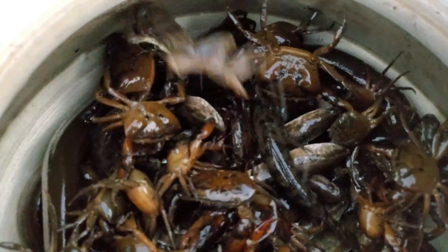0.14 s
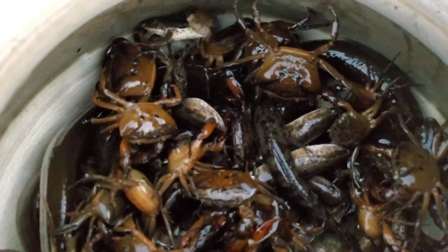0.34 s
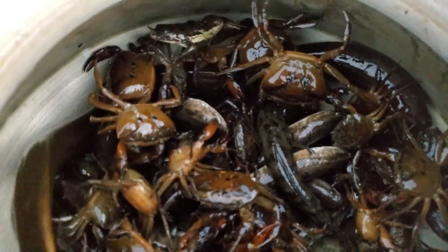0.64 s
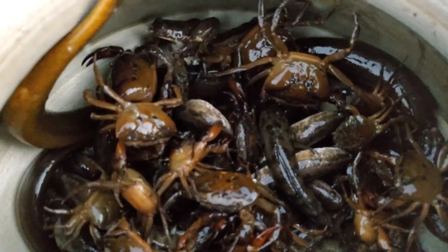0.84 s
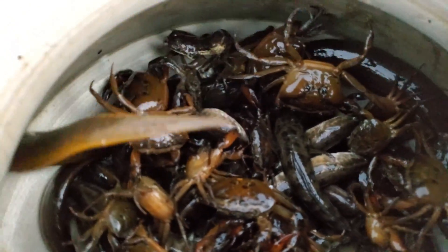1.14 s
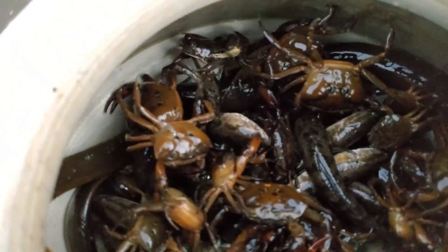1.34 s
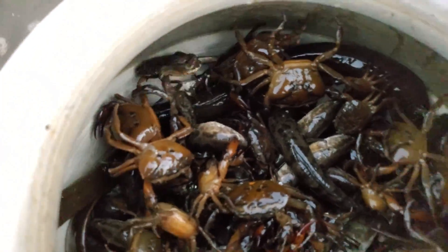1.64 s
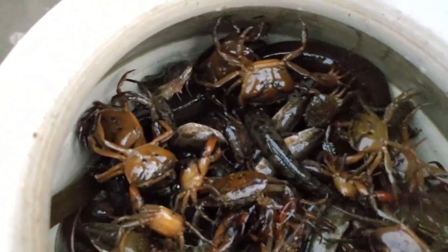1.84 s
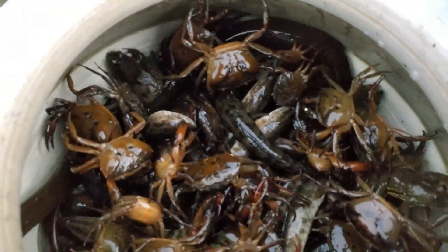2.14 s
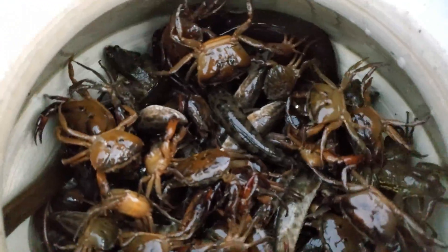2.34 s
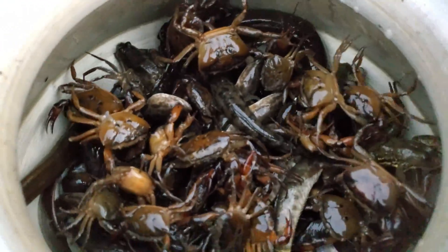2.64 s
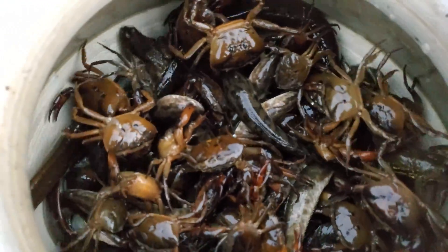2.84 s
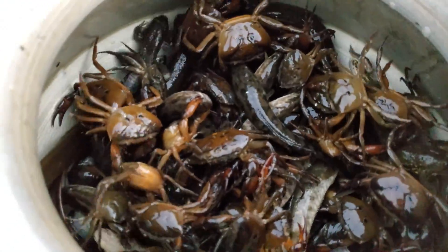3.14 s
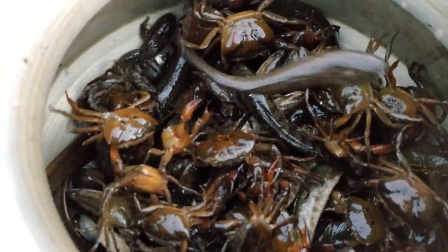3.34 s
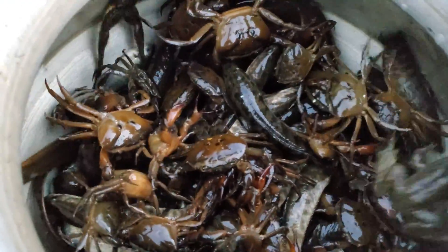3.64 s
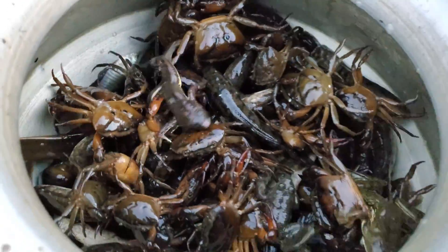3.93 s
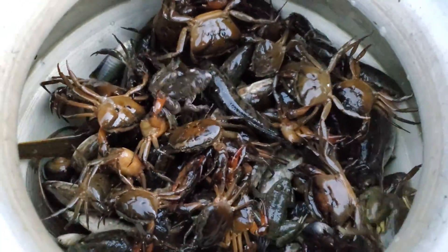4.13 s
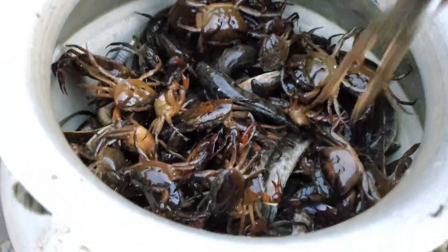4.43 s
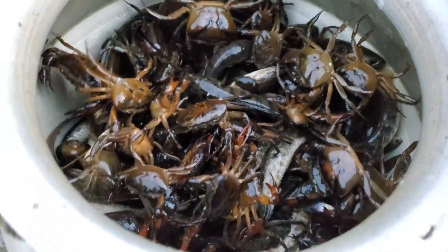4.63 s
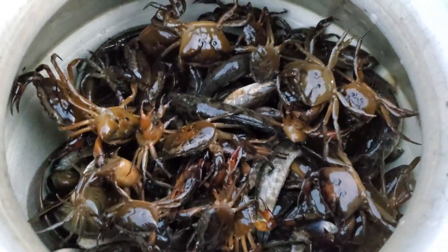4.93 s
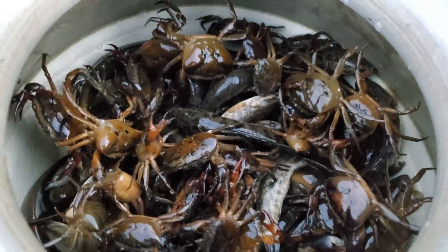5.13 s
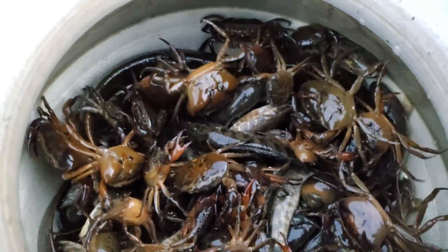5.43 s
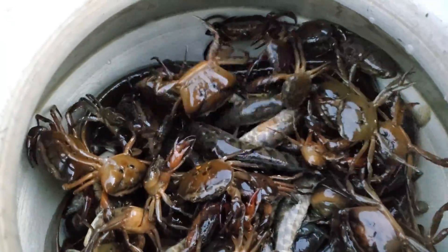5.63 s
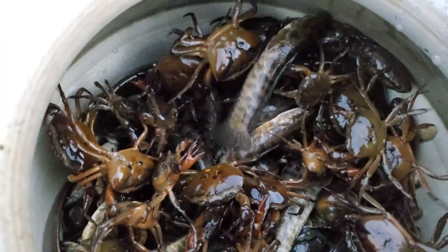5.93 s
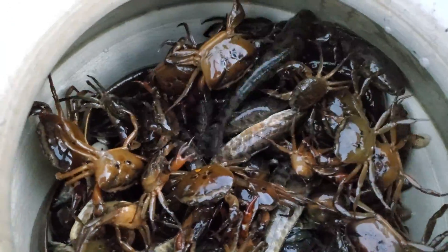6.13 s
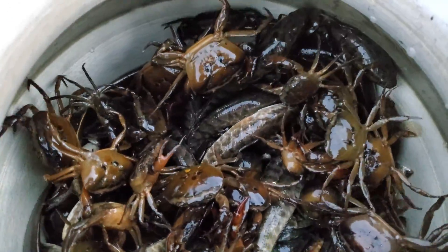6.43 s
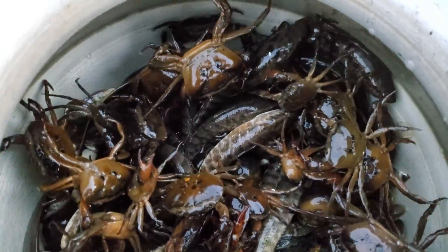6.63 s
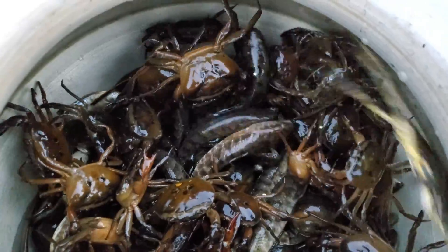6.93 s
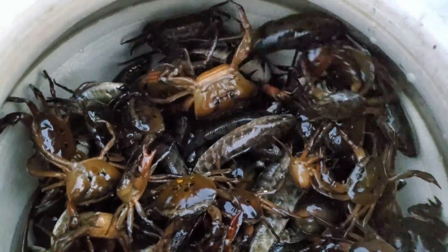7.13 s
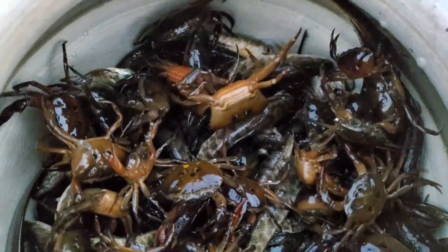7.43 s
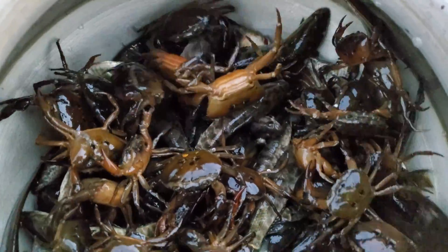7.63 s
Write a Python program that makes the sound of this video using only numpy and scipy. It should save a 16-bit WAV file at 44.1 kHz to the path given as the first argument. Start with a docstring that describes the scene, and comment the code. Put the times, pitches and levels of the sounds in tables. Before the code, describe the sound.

Close above a glazed pot, live crabs, frogs and small fish crawl over each other. Claws tick, skid and scrape in irregular wet bursts, making the wall ring briefly. Bubbles plop, shells squeak, and bodies land with soft low thuds, the strongest near the end of the sixth second. Faint bird chirps, distant traffic rumble and thin hiss lie behind. The crawling lasts throughout.

```python
"""Crabs, frogs and small fish crawl in a wet glazed pot, close below; traffic, birds and hiss lie behind.
From the start claws skid and tick: bursts of stick-slip grains and short modal rings excite the wall.
Bubbles pop from 0.4 s as decaying tones of rising pitch; soft blows ring the bottom from 1.9 s.
Bird trills, four arched chirps each, come at 2.2 and 4.1 s; air gulps as bending tones at 4.5 and 6.5 s.
The hardest taps fall at 4.5 and 4.7 s, the strongest thud at 5.9 s; the crawling lasts to the end."""
import sys
import numpy as np
from scipy import signal
from scipy.fft import rfft, irfft, next_fast_len
from scipy.io import wavfile

SR = 44100
rng = np.random.default_rng(int(sys.argv[2]) if len(sys.argv) > 2 else 0)


def master_out(mix):
    """Clip the mix to full scale and print it as 16-bit PCM to the path in sys.argv[1]."""
    frames = np.transpose(np.atleast_2d(mix))
    ceiling = np.clip(frames, -1, 1)
    pcm = np.round(ceiling * 32767).astype(np.int16)
    wavfile.write(sys.argv[1], SR, pcm)


N = 342657


def amp(db):
    """Level definition: decibels to amplitude ratio."""
    return 10 ** (np.asarray(db) / 20)


def rms_one(x):
    """Normalisation to unit effective value along the last axis."""
    return x / np.sqrt(np.mean(x ** 2, axis=-1, keepdims=True) + 1e-20)


def sides(pan_db):
    """Intensity stereo: left and right gains for a level difference, positive to the left."""
    return amp(np.array([pan_db / 2, -pan_db / 2]))


def drift(corner_hz):
    """Low-pass random process: noise through a double pole, scaled to unit spread."""
    step = 20   # samples between draws
    r = np.exp(-2 * np.pi * step * corner_hz / SR)
    draws = rng.standard_normal(N // step + 2002)
    slow = signal.lfilter([1], [1, -2 * r, r * r], draws)[2000:]   # without the settling
    return np.interp(np.arange(N) / step, np.arange(len(slow)), rms_one(slow))


def coloured(x, spectrum):
    """Spectral shaping: multiplies the Fourier transform by a gain curve over log frequency."""
    hz, level_db = np.transpose(spectrum)
    size = next_fast_len(N)
    bins_hz = np.arange(size // 2 + 1) * SR / size
    gain = amp(np.interp(np.log(bins_hz + 1), np.log(hz), level_db))
    return irfft(rfft(x, size) * gain, size)[..., :N]


def resonance(x, hz, width_hz):
    """Damped resonator: a pole pair sets frequency and bandwidth, with gain 1 at the top."""
    r = np.exp(-np.pi * width_hz / SR)
    zeros = [(1 - r * r) / 2, 0, (r * r - 1) / 2]
    poles = [1, -2 * r * np.cos(2 * np.pi * hz / SR), r * r]
    return signal.lfilter(zeros, poles, x)


def add(out, s, piece):
    """Superposition: mixes a piece in from time s."""
    i = round(s * SR)
    out[..., i:i + piece.shape[-1]] += piece[..., :N - i]


def highpass(x, order, corner_hz):
    """Butterworth high-pass: maximally flat above its corner."""
    return signal.sosfilt(signal.butter(order, corner_hz, "high", fs=SR, output="sos"), x)


def glides(table, waver_db):
    """Frequency modulation: tones bend along a parabola through three pitches, with a wavering level."""
    out = np.zeros(N)
    for s, length, start_hz, middle_hz, end_hz, level_db in table:
        u = np.linspace(0, 1, round(length * SR))
        hz = np.polyval(np.polyfit([0, .5, 1], [start_hz, middle_hz, end_hz], 2), u)
        tone = np.sin(2 * np.pi * np.cumsum(hz) / SR)
        soft_ends = signal.windows.tukey(len(u), .4)
        add(out, s, np.sqrt(2) * amp(level_db) * soft_ends * tone)
    return out * amp(waver_db * drift(56)) * sides(-1.0)[:, None]


def pops(rows):
    """Damped sliding oscillators; rows of t/s, level/dB, f/Hz at 10 ms, rise/(oct/s), t60/s, pan/dB."""
    out = np.zeros((2, N))
    for s, peak_db, hz, rise, t60, pan_db in rows:
        u = np.arange(round(t60 * SR) + 2) / SR
        turns = np.cumsum(hz * 2 ** (rise * (u - .01))) / SR
        shape = (1 - np.exp(-u / 0.00028)) * amp(peak_db - 60 * u / t60)
        add(out, s, sides(pan_db)[:, None] * shape * np.sin(2 * np.pi * turns))
    return out


def steady_db(t):
    """Piecewise-linear levels of rattle, knocking, scratch and fizz of the crawling heap at times t."""
    # the crawling heap: t/s, bustle level/dB, wet knocking level/dB
    heap = [(0.0, -34, -53), (0.69, -36.5, -49), (1.02, -30, -42.5), (1.21, -33, -40), (2.44, -32.5, -49.5),
            (2.75, -31, -57), (2.94, -32, -60), (3.18, -35.5, -40), (4.22, -35.5, -59), (4.78, -35, -47.5),
            (5.04, -42.5, -53), (5.26, -41.5, -54), (5.43, -41, -52), (5.84, -36, -43.5),
            (5.99, -33.5, -47.5), (6.32, -41.5, -58.5), (6.79, -37.5, -55.5), (7.16, -35.5, -43.5),
            (7.4, -30, -45.5), (7.77, -38, -41.5)]
    s, bustle_db, wet_db = np.transpose(heap)
    bustle_db, wet_db = np.interp(t, s, bustle_db), np.interp(t, s, wet_db)
    # fizz takes a share from the bustle, the rest from the wet knocking
    from_bustle = 0.58
    fizz_db = -3 + from_bustle * bustle_db + (1 - from_bustle) * wet_db
    return np.array([bustle_db - 1.5, wet_db, bustle_db - 0.5, fizz_db])


def at_random(per_s, column, above_db, low_hz, octaves, rises, t60s):
    """Poisson process: rows for pops at chance moments, whose level follows one steady layer."""
    chance = rng.random((1200, 6))
    starts = np.cumsum(-np.log(1 - chance[:, 0])) / per_s
    levels_db = steady_db(starts)[column] + above_db
    rows = []
    for s, level_db, (a, b, c, d, e) in zip(starts, levels_db, chance[:, 1:]):
        if s < N / SR:
            hz = low_hz * 2 ** (octaves * b)
            rise, t60 = np.interp(c, [0, 1], rises), np.interp(d, [0, 1], t60s)
            rows.append((s, level_db - 3.7 * a, hz, rise, t60, 2 - 9.7 * e))
    return rows


def left_late(x):
    """Arrival-time difference: the pot is nearer the right, so the left lags by a wandering delay."""
    mean_lag_s, wander = 0.0002114, 0.44   # wander as a share of the mean
    lag = mean_lag_s * SR * (1 + wander * drift(0.81))
    return np.array([np.interp(np.arange(N) - lag, np.arange(N), x[0]), x[1]])


def hiss():
    """Uncorrelated noise: a faint even treble hiss, independent on the two sides."""
    return amp(-51.5) * highpass(rng.standard_normal((2, N)), 2, 2900)


def traffic():
    """Filtered noise: a low rumble nearly alike on both sides, with narrow bands as wavering engine tones."""
    # traffic rumble spectrum: f/Hz, relative level/dB
    rumble_spectrum = [(16, -38), (28, -26.5), (50, 3), (105, -1.5), (118, -5), (147, -4), (227, -16),
                       (282, -9.5), (307, -17.5), (489, -25.5), (557, -22), (756, -26.5), (900, -37),
                       (1170, -20.5), (1980, -120)]
    # engine tones: f/Hz, bandwidth/Hz, level/dB ahead of the high-pass
    engine_tones = [(57.9, 2.5, -48.5), (72.8, 8.8, -47.5), (149, 5.7, -56)]
    mid, side = coloured(rng.standard_normal((2, N)), rumble_spectrum)
    rumble = amp(-44) * rms_one(mid + amp(-15.5) * side * np.array([[1], [-1]]))
    drone = np.zeros(N)
    for hz, width_hz, level_db in engine_tones:
        drone += amp(level_db) * rms_one(resonance(rng.standard_normal(N), hz, width_hz))
    return highpass(rumble + drone, 4, 50)


def birds():
    """Frequency-modulated whistles: single calls, and trills of four arched chirps."""
    # single calls: t/s, length/s, start f/Hz, middle f/Hz, end f/Hz, level/dB ahead of waver
    bird_calls = [(0, 0.027, 2950, 3040, 3000, -37.5), (.553, 0.047, 4160, 3480, 2470, -39.5),
                  (1.32, 0.13, 3000, 3160, 3400, -40), (2.675, 0.064, 3350, 3750, 4360, -43),
                  (4.14, 0.025, 3330, 3430, 3580, -41.5), (4.985, 0.1, 4150, 3410, 3240, -38.5),
                  (6.148, 0.044, 4700, 5000, 4770, -36.5), (6.263, 0.022, 3750, 3780, 3780, -39),
                  (7.315, 0.034, 5150, 4560, 4000, -32.5), (7.41, 0.078, 2750, 3050, 3150, -38.5),
                  (7.52, 0.035, 5060, 4630, 4320, -34.5)]
    # trills: t/s, chirp spacing/s, level/dB ahead of waver
    bird_trills = [(2.174, 0.027, -36), (4.134, 0.021, -34.5)]
    chirp_s, start_hz, middle_hz, end_hz = 0.02, 2650, 2900, 2770
    chirps = []
    for s, gap, level_db in bird_trills:
        for k in range(4):
            chirps.append((s + k * gap, chirp_s, start_hz, middle_hz, end_hz, level_db))
    return glides(list(bird_calls) + chirps, waver_db=3.5)


def thuds():
    """Modal impulse response: a body's soft blow rings the low modes of the bottom."""
    # bodies landing on the bottom: t/s, blow level/dB
    landings = [(1.888, -39), (2.126, -33), (3.233, -24), (3.262, -29), (3.712, -32.5), (4.29, -37.5),
                (5.857, -25.5), (5.901, -13.5), (7.208, -31), (7.239, -23.5)]
    # modes of the pot's bottom: f/Hz, relative level/dB, t60/s
    bottom_modes = [(294, 0.5, 0.066), (400, -16.5, 0.042), (510, -20, 0.066), (168, -35, 0.027)]
    out, u = np.zeros(N), np.arange(SR // 4) / SR
    ring = sum(amp(level_db - 60 * u / t60) * np.sin(2 * np.pi * hz * u)
               for hz, level_db, t60 in bottom_modes)
    for s, blow_db in landings:
        add(out, s, amp(blow_db) * ring)
    return out


def gulps():
    """Rising air tones: air gulps out from under a body as its pitch bends upward."""
    # gulps: t/s, length/s, start f/Hz, middle f/Hz, end f/Hz, level/dB ahead of waver
    air_gulps = [(4.515, 0.062, 480, 631, 890, -54), (6.506, .052, 746, 890, 1310, -45.5)]
    return glides(air_gulps, waver_db=5.0)


def bubbles():
    """Bubble resonance: pitch rises as a bubble nears the surface; small ones follow the knocking."""
    # large bubbles: t/s, peak level/dB ahead of pan, f/Hz at 10 ms, t60/s
    large_bubbles = [(0.384, -36, 1094, 0.21), (0.751, -26, 825, 0.068), (0.806, -29.5, 767, 0.077),
                     (.963, -32, 700, 0.059), (1.073, -34.5, 513, 0.14), (1.243, -23.5, 1460, 0.15),
                     (1.309, -40, 391, 0.24), (1.36, -30.5, 636, 0.11), (1.657, -25, 1056, 0.067),
                     (1.817, -30, 1000, 0.1), (1.873, -25, 1400, 0.073), (2.317, -40, 1100, .08),
                     (2.456, -35.5, 905, 0.045), (2.959, -24, 790, 0.065), (2.979, -28.5, 847, 0.11),
                     (3.053, -34, 914, 0.13), (3.118, -43, 770, .18), (3.158, -35.5, 815, .094),
                     (3.208, -28, 1010, 0.11), (3.569, -25.5, 1060, 0.081), (4.878, -33, 880, 0.039),
                     (4.989, -18.5, 1560, 0.038), (6.186, -27.5, 1260, .051), (7.141, -27, 1430, .049),
                     (7.195, -35, 842, 0.12), (7.288, -29.5, 950, 0.099), (7.558, -37, 433, 0.2)]
    rise_oct_per_s, pan_db = 6.3, -4
    large = [(s, peak_db, hz, rise_oct_per_s, t60, pan_db) for s, peak_db, hz, t60 in large_bubbles]
    small = at_random(75, column=1, above_db=8.5, low_hz=556, octaves=1.8,
                      rises=(0, 9.), t60s=(.015, .055))
    return pops(large + small)


def crackles():
    """Film rupture: films of water burst between legs as bright, fast-damped clicks that follow the fizz."""
    return pops(at_random(36, column=3, above_db=19, low_hz=2975, octaves=2.24,
                          rises=(-9., 9.), t60s=(.005, .011)))


def squeaks():
    """Frictional oscillation: slipping wet shells squeak, bending up or down, and follow the scratch."""
    return pops(at_random(70, column=2, above_db=4, low_hz=1916, octaves=1.7,
                          rises=(-6., 6.), t60s=(.015, .08)))


def taps():
    """Impact excitation: a hard claw tip on a shell gives two damped tones and a burst of crackle."""
    # claw taps, many of them at the start of a skid:
    # t/s, level/dB ahead of tap_db, shell note f/Hz, knock re note/dB, left-right level/dB
    claw_taps = [(0.0386, -9.5, 4750, -27, -1), (0.1072, -10.5, 4700, -17.5, 0),
                 (0.9038, -10, 4460, -17, -1), (1.123, -13, 4500, -8, -2), (1.1687, -13, 2900, -20, -7),
                 (1.5128, -15, 3870, -18, 0), (1.8731, -14, 2470, -16, -12), (2.136, -11.5, 3270, -11, -6),
                 (2.2149, -17, 2570, -20, -2), (2.3464, -17, 5400, -20, -3.5), (2.601, -14, 3200, -27, 0),
                 (2.737, -12, 4470, -26, 1), (3.6474, -20, 4200, -25, -1), (4.2298, -22, 2470, -34, -12),
                 (4.5386, -6, 6700, -36, 2), (4.6029, -17, 2590, -20, -8), (4.7316, -3, 2290, -12, -2.5),
                 (4.7756, -18, 2340, -20, -4.0), (4.976, -18, 4860, -23, -5), (5.173, -15, 4360, -29, -7),
                 (5.854, -19, 2730, -12, -8), (5.885, -13, 1990, -13, -3), (5.9464, -18.5, 1900, -20, -5),
                 (6.336, -23, 4310, -25, -8), (6.9146, -15.5, 4300, -12, -3), (6.94, -18, 4660, -20, -11),
                 (7.057, -10, 5300, -30, -1), (7.4503, -16, 4630, -14, -8), (7.564, -19, 2020, -16, -6)]
    tap_db, t60_s, bright_db, knock_hz = 2.5, 0.012, -15, 1500
    out, u = np.zeros((2, N)), np.arange(SR // 40) / SR
    # differencing tilts the noise towards the treble
    crackle = np.diff(rng.standard_normal((len(claw_taps), 2, len(u) + 1)), axis=-1) / 2
    for (s, level_db, hz, knock_db, pan_db), burst in zip(claw_taps, crackle):
        note = np.sin(2 * np.pi * hz * u)
        knock = amp(knock_db) * np.sin(2 * np.pi * knock_hz * u)
        tap = note + knock + amp(bright_db) * burst
        shape = (1 - np.exp(-u / 0.00012)) * amp(level_db + tap_db - 60 * u / t60_s)
        add(out, s, sides(pan_db)[:, None] * shape * tap)
    return out


def grains():
    """Stick-slip friction: sparse random impulses of uneven size and sign that come in clumps."""
    per_s, spread_db, clump_db = 3000, 1.5, 2.5
    sizes = amp(spread_db * np.minimum(rng.exponential(1, N), 5)) * np.sign(rng.random(N) - .5)
    struck = rng.random(N) < per_s / SR
    return rms_one(sizes * struck * amp(clump_db * drift(21.5)))


def skidding(touches):
    """Stick-slip bursts: returns power envelopes and onset ticks per layer, and ringing notes."""
    # skids: t/s, drag/s, reference level/dB, scratch re rattle/dB, fizz re level/dB, note f/Hz
    claw_skids = [(0.037, 0.004, -22.5, 26, -3, 4340), (0.105, 0.012, -22, 3.5, -8, 4370),
                  (0.134, 0.0077, -26, 5, -9, 4370), (0.175, 0.007, -31, 4, -5, 2610.0),
                  (0.239, 0.05, -30.5, 9, -10, 4400), (0.313, 0.045, -27.5, -3.5, -18, 4490),
                  (0.458, 0.03, -31, 0, -28, 2570), (0.687, 0.02, -27, 3, -4, 2530),
                  (0.785, 0.02, -24, 7, -8, 4020), (0.813, 0.033, -23.5, -1.5, -12, 5060.0),
                  (0.905, 0.056, -25, -0.5, -13, 4350), (1.013, 0.076, -30, -13, -28, 2520),
                  (1.109, 0.023, -25.5, 2, -15, 4360), (1.166, 0.0027, -37.5, -13, -27, 2900.0),
                  (1.196, 0.043, -31, 0, -26, 2860), (1.267, 0.0058, -39.5, 6, -5, 5200),
                  (1.508, 0.0047, -27, -7, -14, 3850.0), (1.553, 0.0074, -28.5, 5, -6, 4480.0),
                  (1.615, 0.013, -23.5, 1.5, -9, 2850), (1.644, 0.0085, -28, 6, -12, 3820),
                  (1.803, 0.021, -20, 3.5, -9.5, 2615), (1.873, 0.027, -28, -8, -9, 3140),
                  (1.912, 0.031, -31, 3, -2, 4500), (2.044, 0.044, -30.5, 18, -9, 4520),
                  (2.115, 0.028, -26, -2, -10, 2900), (2.206, 0.021, -29.5, 1, -5, 2520),
                  (2.323, 0.033, -29.5, 4, -9, 3080), (2.379, 0.032, -35.5, 22, -25, 2920),
                  (2.497, 0.022, -22, 9.5, -17, 4900), (2.564, 0.047, -31.5, 0.5, -17, 2450),
                  (2.63, 0.024, -32.5, 18, -22, 4320.0), (2.737, 0.03, -32, 6, -29, 4340),
                  (2.903, 0.018, -23, -2, -29, 2450), (3.081, 0.033, -39, 6, -16, 4500),
                  (3.108, 0.0059, -28.5, 14, -8, 4300.0), (3.142, 0.04, -28.5, 15, -6, 4670),
                  (3.195, 0.016, -26, 10, -6, 2460), (3.228, 0.034, -23, 4, -9.5, 4380),
                  (3.275, 0.053, -25, 9, -10, 2395), (3.346, 0.0066, -29, 10, -5, 4700),
                  (3.461, 0.022, -27, -4, -10, 4290.0), (3.504, 0.0095, -33.5, 8, -1, 2650),
                  (3.533, 0.064, -31, 5.5, -9, 2520.0), (3.639, 0.015, -26.5, 12, -4.5, 4740),
                  (3.685, 0.09, -34.5, 2, -5, 3270), (3.783, 0.12, -30.5, 4, -7.5, 2650),
                  (3.977, 0.023, -34, 13, -17, 4800), (4.073, 0.033, -38.5, 10, -13, 3300),
                  (4.229, 0.0064, -20, 5, -13, 2540.0), (4.294, 0.11, -33, 3.5, -11, 4060),
                  (4.537, 0.0036, -19, 4.5, -2.5, 4760.0), (4.575, 0.012, -32, 8, -17, 4400),
                  (4.602, 0.0043, -33, -1, -13, 2580.0), (4.73, 0.0081, -25.5, -4, -13, 2350.0),
                  (4.807, 0.043, -33.5, -1, -11, 3580), (4.877, 0.0027, -35, -3, 9, 2800),
                  (4.906, 0.012, -34, 9, 3, 4370), (4.928, 0.018, -30.5, 3, -12, 4360.0),
                  (4.976, 0.035, -37, 4, -11, 4000), (5.082, 0.043, -36, 2, -12, 4070.0),
                  (5.167, 0.025, -24.5, 15, -9, 4420), (5.282, 0.027, -31, -1, -11, 2450),
                  (5.427, 0.016, -31.5, 9, -27, 3660), (5.462, 0.008, -31.5, 2, -7, 4800),
                  (5.488, 0.022, -31, 32, -12, 4400), (5.551, 0.052, -36.5, 11, -12, 4440.0),
                  (5.69, 0.06, -39, 2, -11, 2800), (5.801, 0.003, -30, -19, -27, 2280),
                  (5.852, 0.0044, -28, -21, -20, 1950), (5.882, 0.006, -30, -13, -24, 1890.0),
                  (5.901, 0.0056, -18.5, 4, -22, 1900), (5.972, 0.0036, -31, 0, 0, 2050.0),
                  (6.012, 0.036, -34, -17, -34, 1980), (6.243, 0.0069, -38, 5, -7, 4030.0),
                  (6.337, 0.011, -36.5, 16, -14, 4300.0), (6.555, 0.061, -39.5, 13, -3, 5150),
                  (6.661, 0.024, -39.5, 20, -9, 4770), (6.769, 0.078, -43, 12, -3, 2730.0),
                  (6.939, 0.042, -25, 6.5, -2.5, 3900), (7.05, 0.046, -26.5, 3, -3.5, 3290.0),
                  (7.138, 0.006, -37, 0, -2, 2550), (7.214, 0.005, -29, 4, -2, 2900),
                  (7.241, 0.017, -25.5, 3.5, -6, 3080), (7.304, 0.036, -25.5, 8, -12, 4310.0),
                  (7.344, 0.053, -26, 24, -7, 4660), (7.448, 0.006, -21.5, 15, -4.5, 2530),
                  (7.507, 0.058, -36.5, 17, -11, 4570), (7.633, 0.08, -30.5, 2, -5, 3400)]
    t60_s, pan_db, attack_s, skid_db = 0.056, -4, 0.001166, 2
    burst_db, burst_t60_s, note_db, note_width_hz = -11.5, 0.053, -3, 60
    power, ticks, notes = np.zeros((4, 2, N)), np.zeros((4, 2, N)), np.zeros((2, N))
    pan = sides(pan_db)[:, None]
    for s, drag, level_db, bright_db, fizz_db, hz in claw_skids:
        # rattle and scratch together carry the reference power
        rattle_db = level_db - 10 * np.log10(1 + amp(2 * bright_db))
        layers_db = [rattle_db, rattle_db - 16.5, rattle_db + bright_db, level_db + fizz_db]
        # short skids start hardest: the tick loses 2 dB per doubling of the drag
        tick_db = level_db + 10 - 2 * np.log2(drag / 0.011)
        tick_over_db = tick_db - max(layers_db)
        u = np.arange(round((drag + t60_s) * SR) + 2) / SR
        shape = (1 - np.exp(-u / attack_s)) * amp(-60 * np.maximum(u - drag, 0) / t60_s)
        gains = amp(np.array(layers_db))[:, None, None] * pan
        # the first touch is one sharp tick; the harder it is, the more the skid starts with a burst
        burst = amp(tick_over_db + burst_db - 60 * u / burst_t60_s)
        add(power, s, gains ** 2 * ((amp(skid_db) * shape) ** 2 + burst ** 2))
        add(ticks, s + attack_s, gains * amp(tick_over_db))
        # one mode near the claw answers more than the rest and rings on a little
        slips = np.roll(touches[0], -round(s * SR))[:len(u)] * shape
        note = resonance(np.append(slips, np.zeros(SR // 50)), hz, note_width_hz)
        note *= np.sqrt(SR / np.pi / note_width_hz)   # makes up for the narrow band
        add(notes, s, pan * amp(level_db + note_db) * note)
    return power, ticks, notes


def wall_rings(contacts):
    """Modal resonance: the wall's modes answer the contacts with wandering strength."""
    # modes of the pot's wall: f/Hz, bandwidth/Hz, level/dB ahead of wander
    wall_modes = [(1925, 51, 4.5), (2555, 15.4, 12.5), (2836, 19, 1), (3290, 19, 8.5), (3880, 28, -24),
                  (4385, 36, 10), (4605, 33, 4), (4980, 116, 8.5), (5350, 67, -1)]
    rings = np.zeros((2, N))
    for k, (hz, width_hz, level_db) in enumerate(wall_modes):
        # the points of contact wander, so each mode comes and goes
        drive = contacts * amp(level_db + 2.8 * drift(13.7))
        rings += (-1) ** k * resonance(drive, hz, width_hz)
    return rings


def scrabbling():
    """Source-filter principle: steady and skidding contacts in five bands excite the wall."""
    # spectrum of the contacts: f/Hz, relative level/dB
    contact_spectrum = [(240, -23), (400, -7), (467, -16), (1530, -5), (1930, -7.5), (2180, -4.5),
                        (2550, 0), (3580, -1.5), (4440, 1), (9760, -17.5), (13900, -7), (16000, -15)]
    # bands for rattle, knocking, scratch, lower and upper fizz: a row of low f/Hz, a row of high f/Hz
    band_edges = [1700, 500, 3300, 6500, 10000], [3300, 1700, 6500, 10000, 16500]
    t = np.arange(N) / SR
    steady = amp(steady_db(t))[:, None] ** 2 * sides(-3)[:, None] ** 2
    # the wall sends each side some contacts of its own
    shared = 0.25   # share of power
    touches = np.sqrt(shared) * grains() + np.sqrt(1 - shared) * np.array([grains(), grains()])
    skids, ticks, notes = skidding(touches)
    contacts, out = coloured(touches, contact_spectrum), np.zeros((2, N))
    for k, edges in enumerate(zip(*band_edges)):
        layer = min(k, 3)
        band = signal.butter(3, edges, "band", fs=SR, output="sos")
        peak = np.abs(signal.sosfilt(band, signal.unit_impulse(200))).max()
        # many small movers make the steady part patchy, a skid less so
        patches_db = 2.5 * drift(22.0)
        power = steady[layer] * amp(2 * patches_db) + skids[layer] * amp(patches_db)
        sound = rms_one(signal.sosfilt(band, contacts)) * np.sqrt(power)
        sound += signal.sosfilt(band, ticks[layer] + 1e-18) / peak
        if k > layer:   # the upper fizz is weaker and more central
            sound *= amp(-6.5) * sides(5.5)[:, None]
        out += sound
    return amp(-1.5) * (out + wall_rings(out)) + notes


def scene():
    """Superposition: the delayed pot over the background sources."""
    background = hiss() + traffic() + birds()
    pot = thuds() + gulps() + bubbles() + crackles() + squeaks() + taps() + scrabbling()
    return background + left_late(pot)


def record(dry):
    """Soft saturation rounds the loudest peaks; a steep low-pass at 16250 Hz cuts the top."""
    rounded = dry / (1 + np.abs(dry / .95) ** 6) ** (1 / 6)
    return signal.sosfilt(signal.cheby2(20, 70, 16250, fs=SR, output="sos"), rounded)


dry = scene()
out = record(dry)
master_out(out)
```